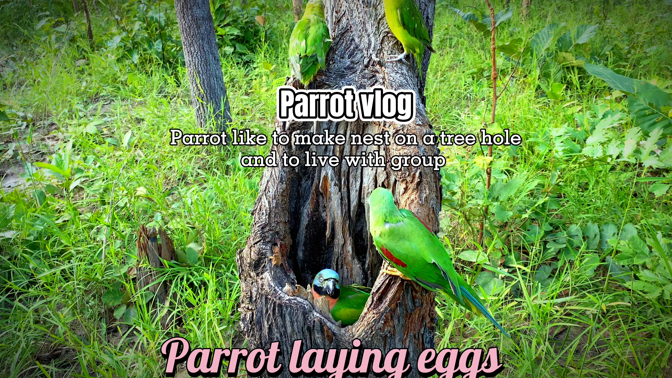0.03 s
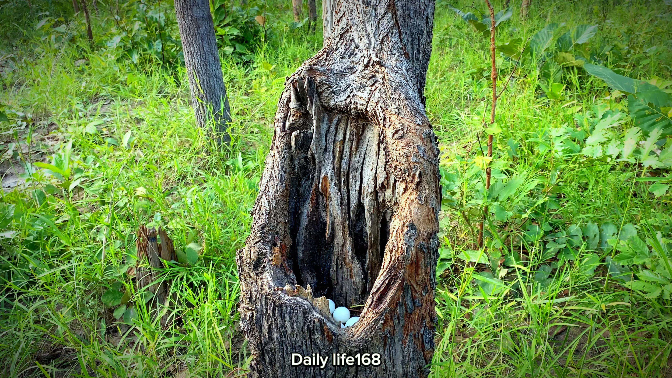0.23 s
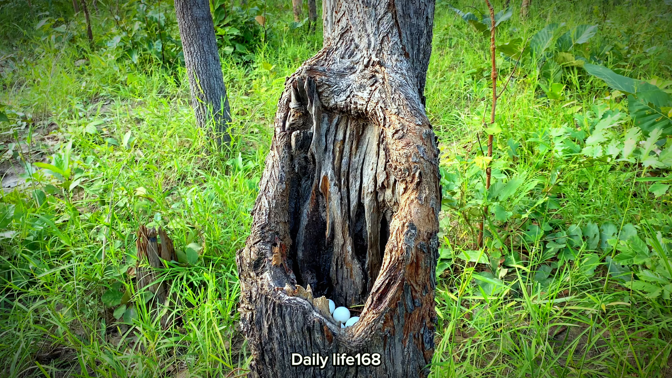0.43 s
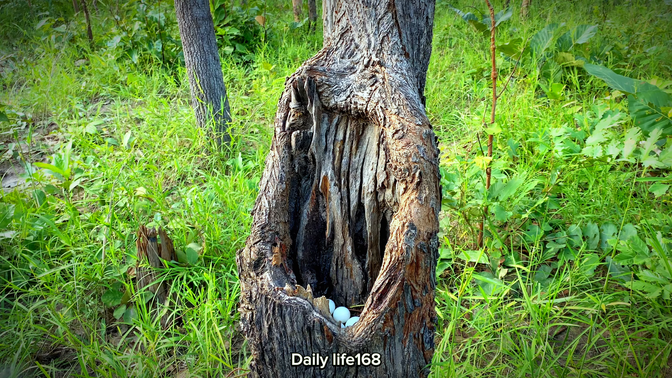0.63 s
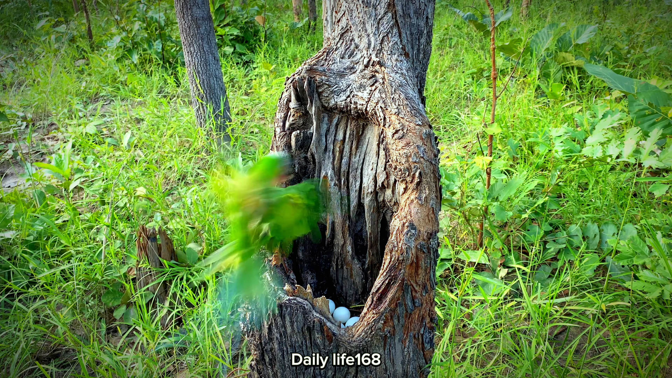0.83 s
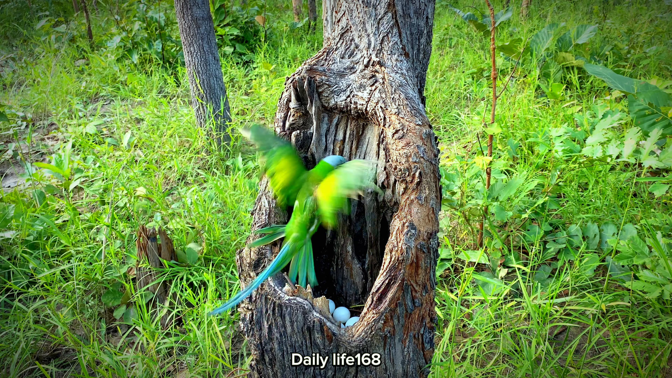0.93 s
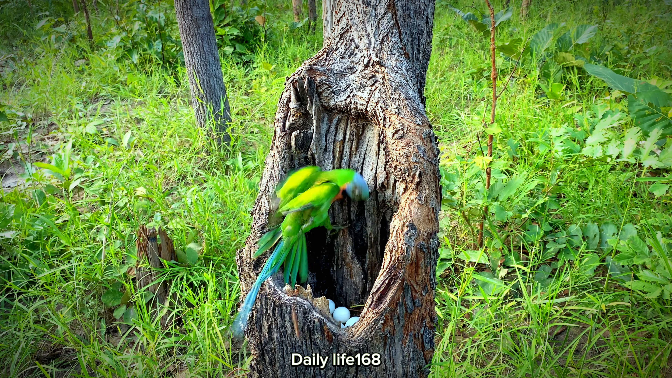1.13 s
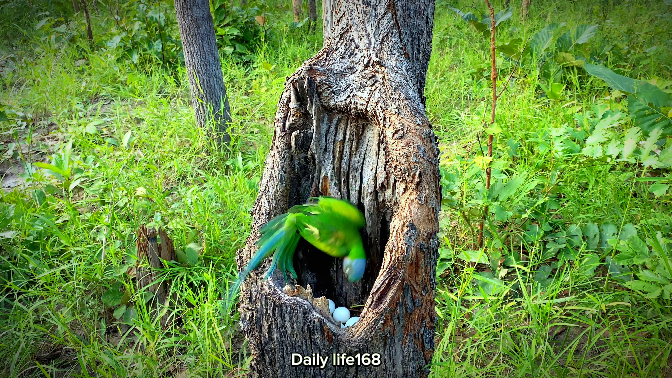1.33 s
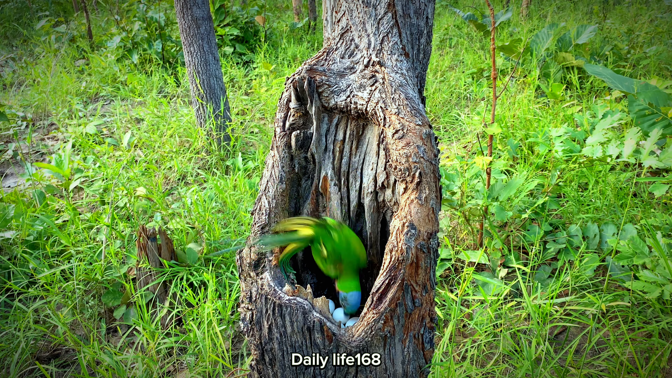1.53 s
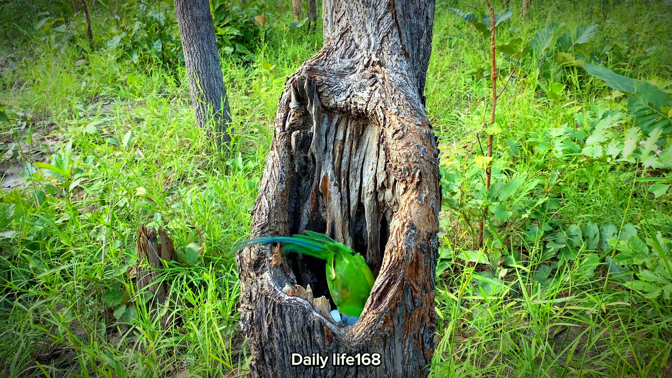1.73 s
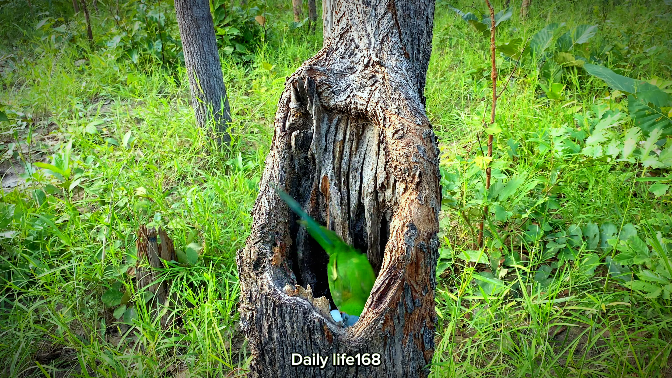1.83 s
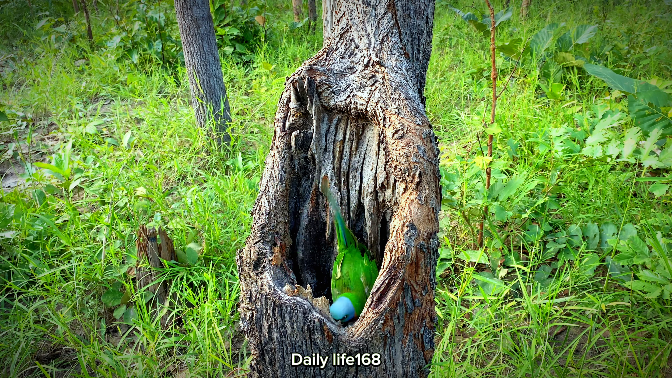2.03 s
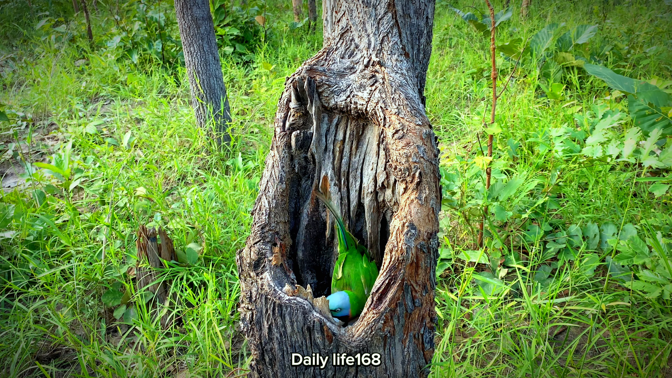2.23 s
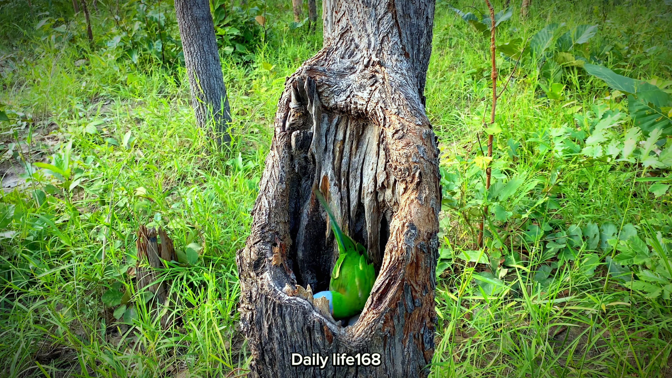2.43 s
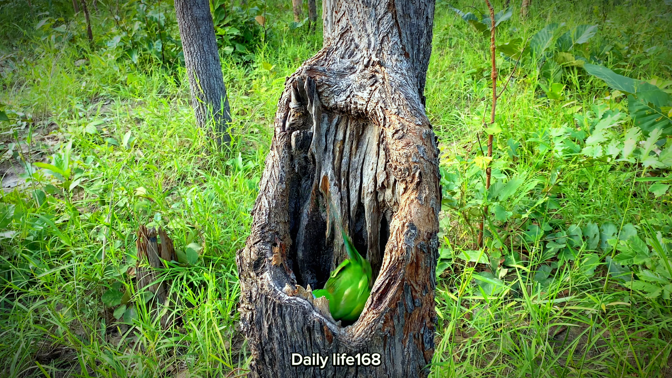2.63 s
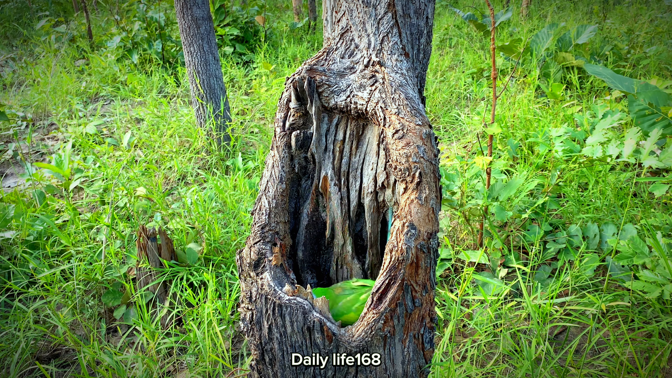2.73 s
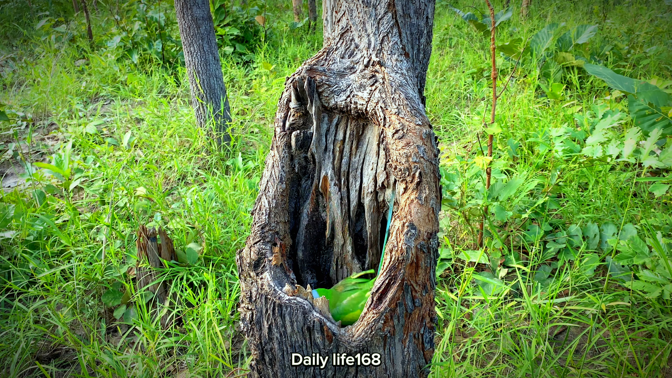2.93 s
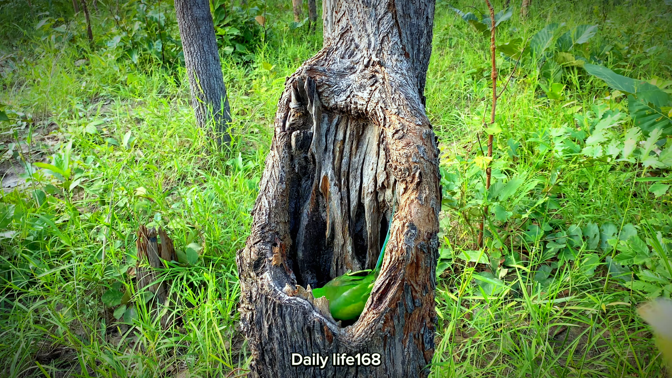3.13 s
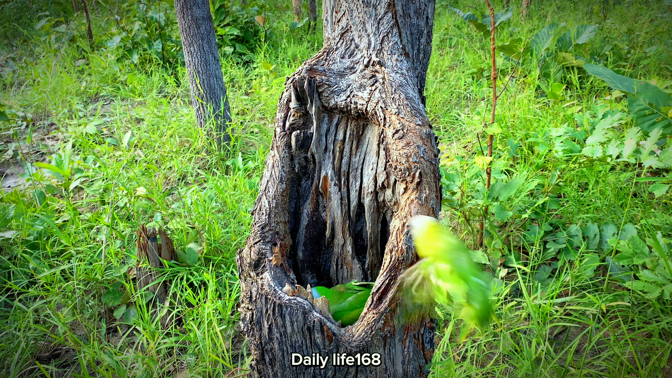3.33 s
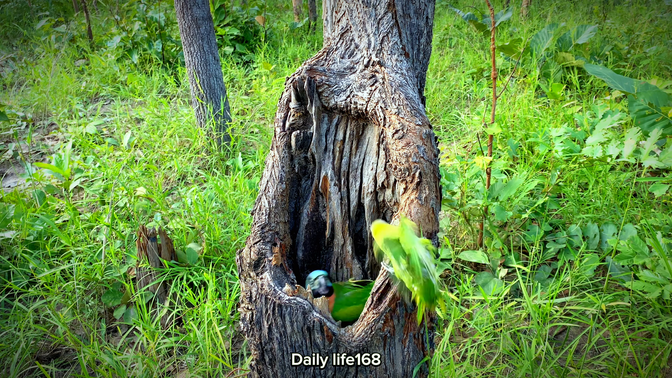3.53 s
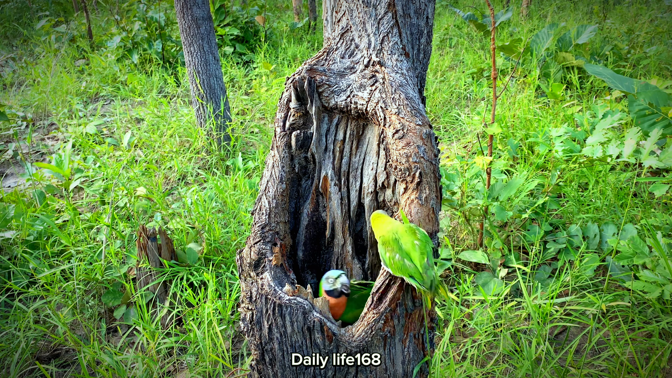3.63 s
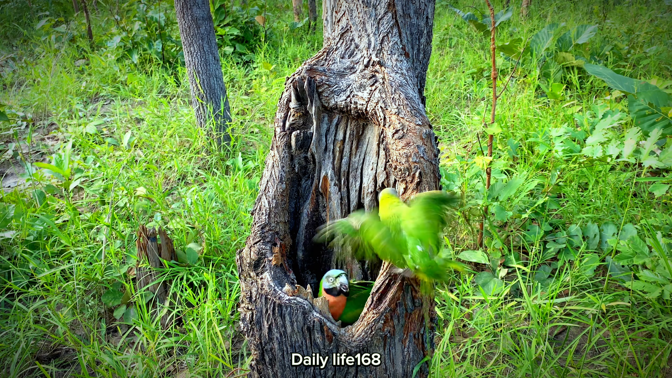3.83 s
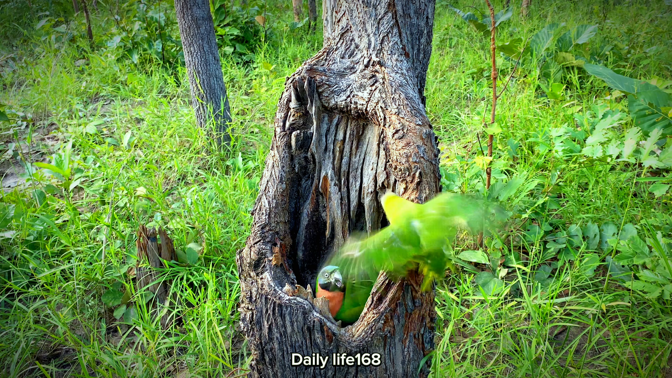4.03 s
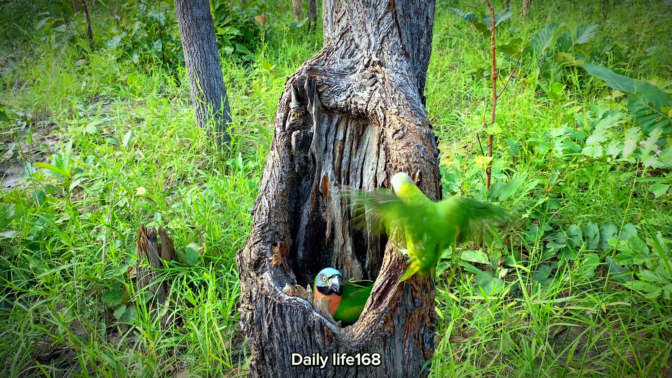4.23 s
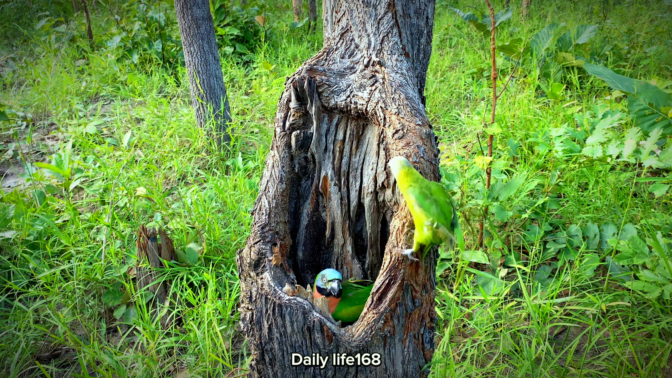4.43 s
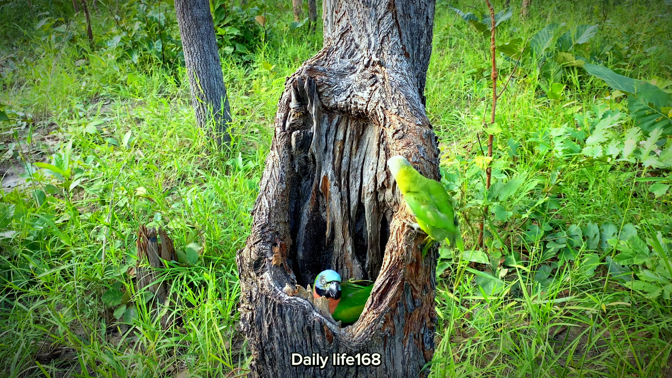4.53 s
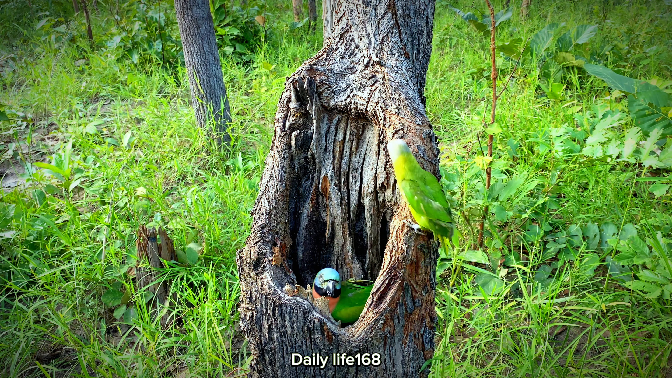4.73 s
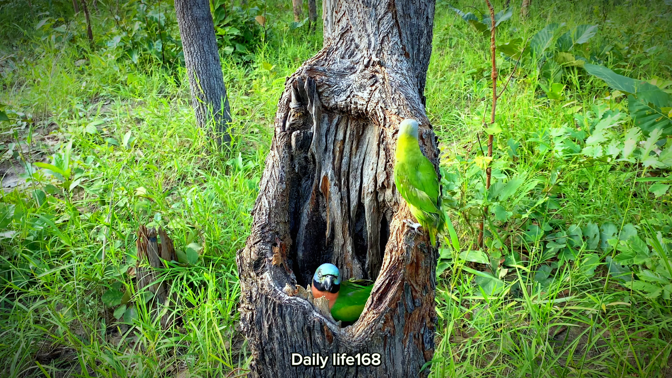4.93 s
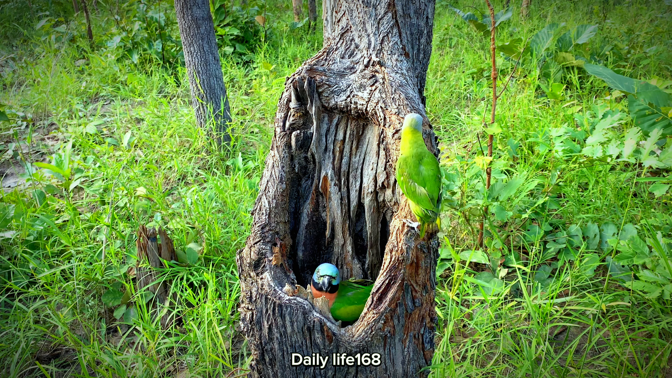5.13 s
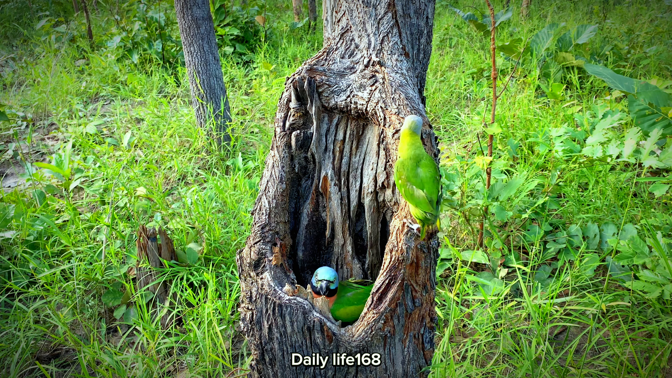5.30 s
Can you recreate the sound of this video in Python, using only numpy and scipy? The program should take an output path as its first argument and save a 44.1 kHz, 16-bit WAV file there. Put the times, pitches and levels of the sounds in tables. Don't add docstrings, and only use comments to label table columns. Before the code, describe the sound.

Sharp wing snaps and low thumps burst as two parrots land at a hollow tree, with claw ticks, rustling feathers and two short croaks over a low hum.

```python
import sys
import numpy as np
from scipy import signal
from scipy.fft import rfft, irfft, next_fast_len
from scipy.io import wavfile
from scipy.ndimage import uniform_filter1d, map_coordinates

SR = 44100
rng = np.random.default_rng(int(sys.argv[2]) if len(sys.argv) > 2 else 0)


def persist_wave(psi):
    counts = np.round(np.clip(psi, -1, 1) * 32767).astype(np.int16)
    wavfile.write(sys.argv[1], SR, np.atleast_2d(counts).T)


def ratio(d):
    e = np.asarray(d, float) / 20
    return 10 ** e


N = 264600
START_S = .5539

# f/Hz, width/Hz, level/dB
ENGINE_HUM = [(51.1, 9.6, -44.5), (113.1, 21.6, -44.5)]
# f/Hz, width/Hz, level/dB
INSECT_BANDS = [(4590, 650, -65.5), (7830, 240, -68), (1020, 160, -65.5)]
# f/Hz, level/dB
FAR_COLOUR = [(20, -63), (45, -14.5), (90, -13), (140, -8.5), (260, -27), (520, -20.5), (740, -28),
              (900, -37), (1500, -41), (3000, -55.5), (8000, -55.5), (12000, -50), (15500, -64)]
# f/Hz, likeness/0-1
FAR_ALIKE = [(60, 1), (290, 0.82), (640, 0.33), (1400, 0), (15000, 1)]
# f/Hz, likeness/0-1
NEAR_ALIKE = [(100, 0.97), (500, 0.92), (1100, 0.29), (2000, 0.59), (5000, 0.58), (9000, 0.2)]
LEAD_S = .000048

# t/s, length/s, feather rustle level/dB, wing effort level/dB
MOVEMENT_BOUTS = [(0.542, 0.43, -45.5, -28.5), (1.002, 0.24, -50, -53), (1.25, 0.22, -57.5, -45),
                  (1.525, 0.11, -46, -35.5), (1.793, 0.12, -58, -36.5), (2.006, 0.39, -71.5, -53.5),
                  (2.41, 0.27, -63.5, -44), (2.689, 0.24, -54, -36), (3.02, 0.41, -40, -25),
                  (3.49, 0.037, -51, -30.5), (3.68, 0.13, -61, -44), (3.854, 0.078, -42.5, -26),
                  (3.944, 0.35, -52, -36.5), (4.363, 0.726, -68.5, -43.5), (5.2, .12, -58, -46),
                  (5.42, 0.17, -40.5, -35), (5.516, 0.29, -36, -21.5), (5.868, 0.15, -35, -29.5)]
RISE_DB_PER_S, FALL_DB_PER_S = 282, 131
WHOOSH_SHARE, WHOOSH_DB = 0.33, -8.5
GUST_S, GUST_DB, GUST_WHOOSH_DB = 0.026, -18.5, -30
CRACKLE_HZ, CRACKLE_DB, CRACKLE_SPREAD_DB = 300, -6, 3
# f/Hz, level/dB
FEATHER_COLOUR = [(700, -77), (1300, 12), (2200, 10), (4500, 9), (7000, 2), (9000, 13), (12500, -1.5),
                  (15000, -9)]
# f/Hz, level/dB
WHOOSH_COLOUR = [(150, 5), (260, -4), (450, 3.5), (700, 2), (1050, -10.5), (1500, -27.5)]
# f/Hz, level/dB
PUSH_COLOUR = [(15, -47), (35, 0), (60, 5.5), (100, 2.5), (180, -5), (260, -13.5), (400, -32)]
# t/s, length/s, f/Hz, level/dB
RUBS = [(0.574, 0.033, 1510, -48), (0.832, 0.014, 7040, -54), (0.967, 0.017, 5430, -36),
        (1.114, 0.034, 1210, -52), (1.197, 0.037, 2420, -51), (1.329, 0.06, 8300, -44.5),
        (1.852, 0.059, 1860, -48), (1.979, 0.042, 840, -49), (2.708, 0.096, 570, -42.5),
        (2.827, 0.035, 8950, -48), (3.021, 0.014, 613, -29.5), (3.31, 0.031, 624, -44),
        (3.669, 0.0055, 3820, -47), (4.087, 0.068, 2100, -52), (4.787, 0.012, 3000, -55),
        (5.393, 0.14, 2170, -50.5)]

# t/s, level/dB, beak opening/0-1
CROAK_SHAPES = [
    [(3.953, -36, 0.7), (3.974, -27, 0.04), (3.995, -18, 0.45), (4.02, -21.5, 0.19), (4.04, -26.5, 0.3),
     (4.062, -32.5, 0)],
    [(5.862, -39.5, 0), (5.886, -21, 0.27), (5.91, -13.5, 0.22), (5.935, -23, 0), (5.953, -30, 0.16)],
]
# first t/s, first gap/s, gap growth/ratio, level over the croak/dB, slips/count
THROAT_JOLTS = [
    (3.974, 0.012, .99, 15.5, 2),
    (3.9935, 0.0036, 1.8, 16, 4),
    (4.0275, .0073, 2.04, 8, 3),
    (5.891, .0125, .6, 9, 2),
    (5.911, 0.0081, 1.01, 8, 5),
]
# f/Hz, width/Hz, level/dB
SHUT_THROAT = [(1528, 514, 5.5), (3510, 150, 5.5), (4910, 740, 1), (5970, 1100, -1), (9400, 5100, -13)]
# f/Hz, width/Hz, level/dB
OPEN_THROAT = [(1950, 430, 3.5), (4070, 300, 5.5), (4840, 200, 2.5), (6800, 1000, -7), (8740, 660, 2)]
# f/Hz, width/Hz, level/dB
POUCH = [(392, 73, 2), (493, 166, -1.5), (656, 145, -4)]

# t/s, peak level/dB, thump level below it/dB, colour f/Hz, thump f/Hz
WING_BEATS = [(0.5567, -20.5, -3, 1950, 474), (.631, -3, -21, 2320, 870), (0.638, -16, -3, 2300, 212),
              (.7288, -5.5, -22.5, 3900, 586), (0.8722, -11.5, -10, 5640, 386), (0.8883, 2, -15, 2300, 486),
              (.8965, -9.5, -5, 3600, 472), (0.9846, -1, -13.5, 1950, 730), (3.044, -12.5, -11, 1830, 625),
              (3.07, -12, -18, 3740, 300), (3.1057, -8.5, -17, 2130, 199), (3.1794, -5, -18, 1900, 627),
              (3.1947, -17, -11, 2460, 570), (3.2524, -11, -16, 2380, 387),
              (3.3241, -11.5, -19.5, 2780, 667), (3.34, -16, -16, 2070, 576), (3.3923, -7, -12, 2520, 404),
              (5.5475, -1.5, -18, 1920, 232), (5.6616, -22.5, 1.6, 2600, 222),
              (5.711, -17.5, -8, 2320, 580), (5.7507, -19, -2.5, 2660, 497), (5.779, -3.5, -14, 1130, 360),
              (5.789, -10.5, -15, 1650, 610), (5.9565, -6, -9, 3630, 386)]
# t/s, peak level/dB
SOFT_PATS = [(0.6008, -25), (0.8232, -24.5), (.842, -27), (1.585, -27), (1.7822, -34), (1.9934, -42),
             (3.138, -26), (3.2673, -19.5), (3.5164, -36), (3.851, -37), (3.8757, -19.5), (4.205, -38),
             (4.243, -39), (5.401, -39), (5.5055, -25.5), (5.597, -34), (5.617, -18.5), (5.8124, -17.5),
             (5.99, -24)]
PAT_THUMP_DB, PAT_HZ, PAT_THUMP_HZ = -10.5, 2300, 404
# t/s, peak level/dB, colour
# f/Hz
TICKS = [(1.1503, -33.5, 5200), (1.218, -27, 2170), (1.4682, -30, 1960), (1.513, -24, 4840),
         (1.5262, -20.5, 3400), (1.546, -17.5, 2980), (1.564, -20.5, 4460), (1.622, -23, 1530),
         (1.633, -26, 2670), (1.6604, -29, 2790), (1.696, -40, 1690), (1.7725, -21, 4760),
         (2.593, -39, 4400), (2.659, -34, 4140), (3.009, -30, 4150), (3.375, -20, 4240),
         (3.4446, -23.5, 1950), (3.5573, -27.5, 6150), (3.8154, -31.5, 4430), (3.917, -31, 1980),
         (4.1245, -27.5, 2140), (4.373, -33, 6740), (4.5325, -37.5, 6120), (4.788, -44, 4560),
         (4.883, -41, 4970), (4.967, -42, 4600), (5.2167, -43, 4700), (5.7187, -19, 4400),
         (5.4334, -32, 2220), (5.474, -29, 2110)]
TICK_THUMP_DB, TICK_THUMP_HZ = -35, 436
BEAT_S, PAT_S, TICK_S = .0037, .005, .0026
SAG_S, SAG_FROM, SAG_TO, SAG_SHARE = .0016, 1.8, .88, 1.1
SNAP_SIZE = 7
# f/Hz, level/dB
CRACK_COLOUR = [(500, -43), (1000, 2.5), (2200, -10), (4500, 2), (7000, -5), (9500, 2.5), (13000, -5.5),
                (16000, -15.5)]
# f/Hz, width/Hz, level/dB
HOLLOW = [(125, 420, -5.5), (433, 314, 4.5), (650, 490, -5.5), (1067, 66, -5.5)]

# f/Hz, share/0-1
SHARED_TREBLE = [(5600, 0), (6500, .6), (7500, .9), (8500, 1)]
# f/Hz, left minus right level/dB
MICROPHONE_TILT = [(60, -2), (180, -2.5), (400, .5), (1300, -3), (2500, 3), (5200, 5.5), (7400, 0),
                   (15000, 0)]
IN_PHASE_HZ, COMB_HZ = 10200, 3750
TOP_HZ = 15900


def unit(x):
    return x / np.sqrt(np.mean(x ** 2) + 1e-20)


def along(points, hz):
    f, v = np.transpose(points)
    return np.interp(np.log(hz + 1), np.log(f + 1), v)


def curves(rows):
    s, *cols = np.transpose(rows)
    return [np.interp(np.arange(N) / SR, s, c, c[0], c[-1]) for c in cols]


def wobble(rate):
    knots = rng.standard_normal(int(N * rate / SR) + 4)
    return map_coordinates(knots, [np.arange(N) * rate / SR])


def filtered(x, response):
    m = next_fast_len(x.shape[-1] + 4096)
    spectrum = rfft(x, m) * response(np.fft.rfftfreq(m, 1 / SR))
    return irfft(spectrum, m)[..., :x.shape[-1]]


def modes(table):
    def response(f):
        return sum((-1) ** k * ratio(db) * 1j * f * w / (c * c - f * f + 1j * f * w)
                   for k, (c, w, db) in enumerate(table))
    return response


def spread(pair, alike, lead_s):
    def mid_and_side(hz):
        turn = np.arccos(np.clip(along(alike, hz), -1, 1)) / 2
        return np.array([np.cos(turn), np.sin(turn)])

    mid, side = filtered(pair, mid_and_side)
    lead = lambda hz: np.exp(np.pi * 1j * hz * lead_s * np.array([[1], [-1]]))
    return filtered(np.array([mid + side, mid - side]), lead)


def hiss(spectrum, grain_db=0., rate=400):
    noise = ratio(grain_db * wobble(rate)) * rng.standard_normal((2, N))
    return unit(filtered(noise, lambda hz: ratio(along(spectrum, hz))))


def patchy(x, depth_db):
    z = signal.stft(x, nperseg=256)[2]
    field = uniform_filter1d(rng.standard_normal(z.shape[1:]), size=9, axis=0)
    field = uniform_filter1d(field, size=12, axis=1)
    return unit(signal.istft(z * ratio(depth_db * unit(field)), nperseg=256)[1][:, :N])


def narrow(table, unsteady_db):
    out = np.zeros((2, N))
    for hz, width, db in table:
        level = ratio(db + unsteady_db * wobble(9.8))
        noise = rng.standard_normal((2, N))
        out += level * unit(filtered(noise, lambda f: 1 / (1 + ((f - hz) / (width / 2)) ** 4)))
    return out


def distance():
    turns = np.cumsum(33 * (1 + 0.0074 * wobble(0.53))) / SR
    firing = np.diff(np.floor(turns), prepend=0)
    ticks = filtered(firing * ratio(3 * wobble(5)), lambda f: modes([(1500, 900, -15.5)])(f) ** 2)
    wash = ratio(-44.5 + 0.71 * wobble(1.9)) * patchy(hiss(FAR_COLOUR, grain_db=0.6, rate=17), depth_db=3.0)
    hum = narrow(ENGINE_HUM, unsteady_db=3.0)
    insects = narrow(INSECT_BANDS, unsteady_db=1.2)
    return spread(wash + hum + insects, FAR_ALIKE, lead_s=0.) + ticks


def trunk(x):
    t = np.arange(SR // 8) / SR
    tail = rng.standard_normal((2, len(t))) * ratio(-60 * t / 0.05)
    tail /= np.linalg.norm(tail[0])
    late = np.pad(x, (60, 0))[None]
    return signal.fftconvolve(late, tail, axes=1)[:, :N]


def bouts():
    t = np.arange(N) / SR
    start, length, rustle_db, effort_db = np.transpose(MOVEMENT_BOUTS)[:, :, None]
    rise_db = -RISE_DB_PER_S * np.clip(start - t, 0, None)
    fall_db = -FALL_DB_PER_S * np.clip(t - start - length, 0, None)
    shape_db = rise_db + fall_db
    return (rustle_db + shape_db).max(axis=0), (effort_db + shape_db).max(axis=0)


def gusts():
    kicks = np.zeros(N)
    for s, db, thump_db, *_ in WING_BEATS:
        kicks[round(s * SR)] = ratio(db + thump_db)
    t = np.arange(-SR // 8, SR // 8) / SR
    return np.abs(signal.fftconvolve(kicks, np.exp(-(t / GUST_S) ** 2), "same"))


def quill_clicks():
    chance = rng.random((2, N))
    strength = ratio(-CRACKLE_SPREAD_DB * np.log(chance[1] + .07))
    clicks = (chance[0] < CRACKLE_HZ / SR) * strength
    decay = ratio(-60 * np.arange(400) / SR / 0.0092)
    return unit(signal.fftconvolve(clicks, decay)[:N] * hiss(FEATHER_COLOUR))


def stir():
    rustle_db, effort_db = bouts()
    whoosh_db = WHOOSH_SHARE * rustle_db + (1 - WHOOSH_SHARE) * effort_db + WHOOSH_DB
    flutter, gust = wobble(28), gusts()
    grains = patchy(ratio(3 * flutter) * hiss(FEATHER_COLOUR, grain_db=4., rate=350), depth_db=3.)
    rustle = ratio(rustle_db + 1.14 * wobble(12)) * (grains + ratio(CRACKLE_DB) * quill_clicks())
    face = unit(ratio(0.47 * flutter) * hiss(WHOOSH_COLOUR, grain_db=2.0, rate=60))
    whoosh = (ratio(whoosh_db) + ratio(GUST_WHOOSH_DB) * gust) * face
    push = (ratio(effort_db - 7.5) + ratio(GUST_DB) * gust) * hiss(PUSH_COLOUR, grain_db=-0.5, rate=18)
    return rustle + whoosh + push


def squeaks():
    out = np.zeros((2, N))
    for s, length, hz, db in RUBS:
        size, at = round(length * SR), round(s * SR)
        rub = filtered(rng.standard_normal((2, size)), lambda f: modes([(hz, .3 * hz, 0)])(f) ** 2)
        out[:, at:at + size] += ratio(db) * unit(rub) * np.hanning(size) ** .5
    return out


def throat_jolts():
    jolts = np.zeros(N)
    for first, gap, growth, db, count in THROAT_JOLTS:
        gaps = gap * growth ** np.arange(round(count) - 1)
        times = first + np.cumsum(np.r_[0, gaps])
        jolts[np.round(times * SR).astype(int)] = ratio(db + 1.5 * rng.standard_normal(len(times)))
    return jolts


def croaks():
    out, jolts, t = np.zeros(N), throat_jolts(), np.arange(N) / SR
    for rows in CROAK_SHAPES:
        level_db, opening = curves(rows)
        opening = np.clip(opening, 0, 1)
        slips = np.diff(np.floor(np.cumsum(380 * ratio(3.2 * wobble(150))) / SR), prepend=0)
        air = rng.standard_normal(N) * ratio(0.99 * wobble(200))
        gain = ratio(level_db) * ((t > rows[0][0]) & (t < rows[-1][0]))
        drive = gain * ratio(15) * (slips * ratio(1.7 * wobble(250)) + 0.06 * air + jolts)
        bright = filtered(drive, lambda f: modes(OPEN_THROAT)(f) ** 2)
        dull = filtered(drive, lambda f: modes(SHUT_THROAT)(f) ** 2)
        pouch = filtered(0.35 * drive + ratio(1.0) * gain * air, modes(POUCH))
        out += ratio(6.5) * (opening * bright + (1 - opening) * ratio(-5.5) * dull) + ratio(16) * pouch
    return out


def contacts():
    vary = ratio(2.5 * rng.standard_normal((len(SOFT_PATS) + len(TICKS), 2)))
    beats = [(*beat, BEAT_S) for beat in WING_BEATS]
    pats = [(s, db, PAT_THUMP_DB, PAT_HZ * a, PAT_THUMP_HZ * b, PAT_S)
            for (s, db), (a, b) in zip(SOFT_PATS, vary)]
    ticks = [(s, db, TICK_THUMP_DB, hz, TICK_THUMP_HZ * b, TICK_S)
             for (s, db, hz), (a, b) in zip(TICKS, vary[::-1])]
    return beats + pats + ticks


def snaps():
    size = SR // 20
    cracks, blows = np.zeros((2, N + size)), np.zeros((2, N + size))
    t = np.arange(size) / SR
    sag = np.cumsum(SAG_TO + (SAG_FROM - SAG_TO) * np.exp(-t / SAG_S)) / SR
    fade = lambda s60: (1 - np.exp(-t / 0.00021)) * ratio(-60 * t / s60)
    for s, db, thump_db, hz, thump_hz, length in contacts():
        at, life = round(s * SR), max(length, .0005)
        grains = ratio(4.9 * rng.standard_normal(size // 12 + 1).repeat(12)[:size])
        rattle = grains * rng.standard_normal((2, size))
        rattle[0, 12] += SNAP_SIZE
        crack = (fade(3 * life) + ratio(-24) * fade(.05)) * rattle
        crack = filtered(crack, lambda f: ratio(along(CRACK_COLOUR, f)))
        crack *= ratio(.22 * (db + 8))
        tone = filtered(fade(4.5 * life) * rattle, modes([(hz, .4 * hz, 4)]))
        snap = crack + tone
        cracks[:, at:at + size] += ratio(db + 4.0) * snap / np.abs(snap).max()

        trapped_air = SAG_SHARE * np.sin(2 * np.pi * thump_hz * sag) * [[1], [0]]
        shove = np.exp(-(t / life) ** 2) * (rng.standard_normal((2, size)) + trapped_air)
        blow = filtered(shove, lambda f: modes(HOLLOW)(f) + modes([(thump_hz, .32 * thump_hz, 4)])(f))
        blows[:, at:at + size] += ratio(db + thump_db + 5.5) * blow / np.abs(blow).max()
    return cracks[:, :N], blows[:, :N]


def scene():
    cracks, blows = snaps()
    croak = croaks()
    voice = spread(np.array([croak, 0.21 * croak]), [(100, 0.53), (9000, 0.76)], LEAD_S)
    voice += ratio(-7.5) * trunk(croak)
    birds = spread(stir() + squeaks() + blows + cracks, NEAR_ALIKE, LEAD_S)
    answer = ratio(-11.5) * trunk(cracks[0]) + ratio(-12) * trunk(blows[0])
    return distance() + birds + voice + answer


def widened(x):
    hz, t, z = signal.stft(x, SR, nperseg=1024)
    f = hz[:, None]
    half = np.pi * (f // 345 * 345 + 170 - IN_PHASE_HZ) / COMB_HZ
    right = np.exp(2j * np.pi * (f - IN_PHASE_HZ) / COMB_HZ)
    treble = np.sum(np.abs(z[0, hz > 6000]) ** 2, axis=0) + 1e-20
    calm = treble < ratio(14) * np.roll(treble, 2)
    luck = rng.standard_normal((len(hz) // 8 + 1, len(t) // 6 + 1))
    luck = luck.repeat(8, 0).repeat(6, 1)[:len(hz), :len(t)]
    least = calm * np.clip(f / 24000 * ratio(4.5 * luck) - .1, 0, .8)
    total = (1 + right) / 2 * (abs(np.cos(half)) > least)
    diff = (1 - right) / 2 * (abs(np.sin(half)) > 1.25 * least)
    mono = along(SHARED_TREBLE, hz)[:, None]
    z = mono * z[0] * np.array([total + diff, total - diff]) + np.sqrt(1 - mono ** 2) * z
    return signal.istft(z * ~(calm & (f > TOP_HZ)), SR, nperseg=1024)[1][:, :N]


def band_limit(x):
    return signal.sosfilt(signal.butter(12, 16500, fs=SR, output="sos"), x)


def record(dry):
    x = filtered(widened(dry), lambda f: ratio(along(MICROPHONE_TILT, f) * np.array([[.5], [-.5]])))
    x = x / (1 + np.abs(x / .95) ** 6) ** (1 / 6)
    mix = x * (np.arange(N) > START_S * SR)
    return band_limit(mix)


dry = scene()
out = record(dry)
persist_wave(out)
```